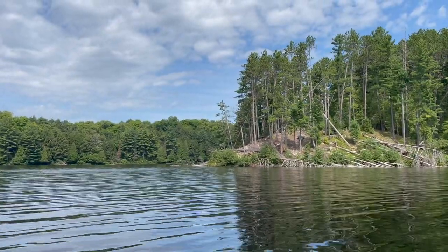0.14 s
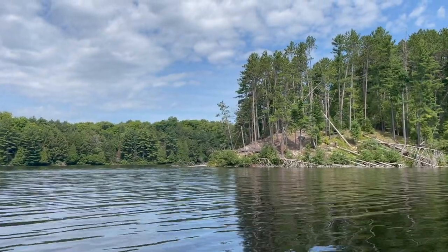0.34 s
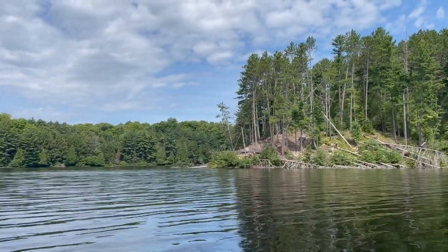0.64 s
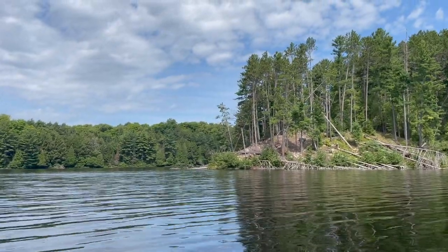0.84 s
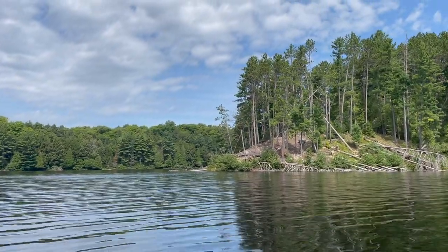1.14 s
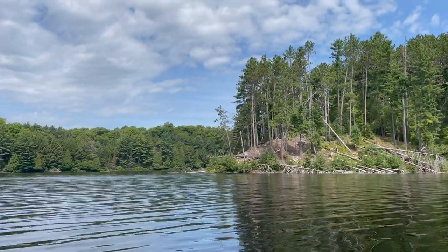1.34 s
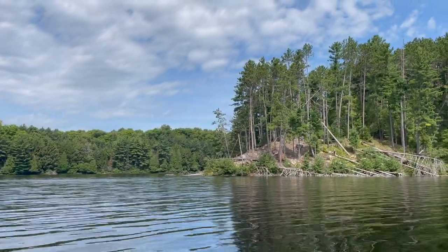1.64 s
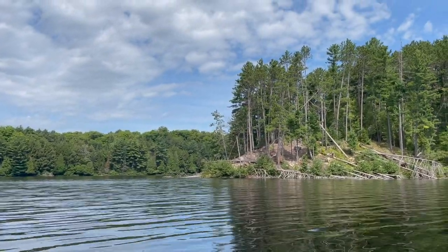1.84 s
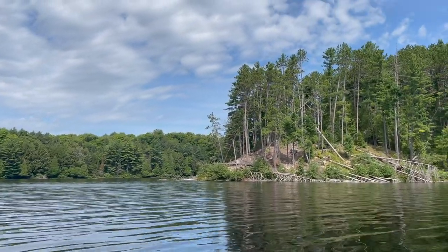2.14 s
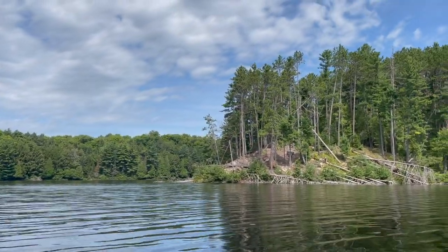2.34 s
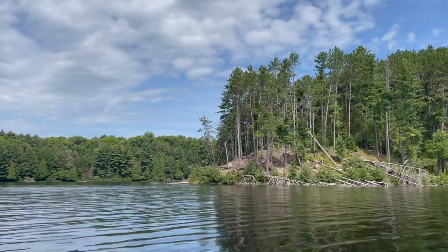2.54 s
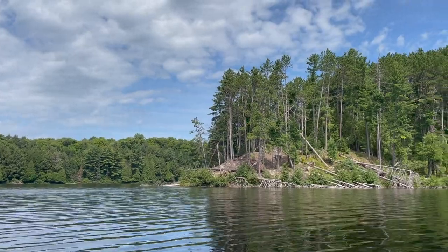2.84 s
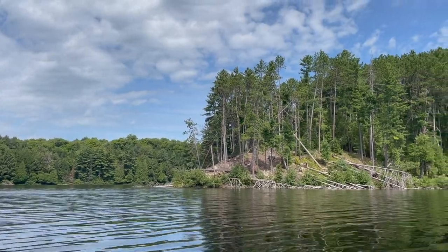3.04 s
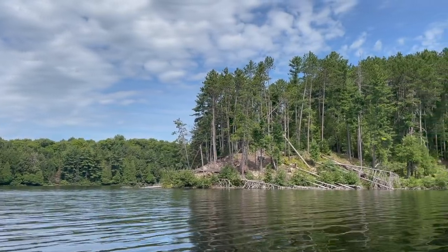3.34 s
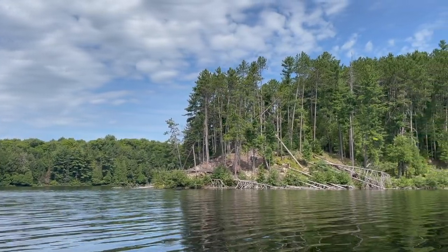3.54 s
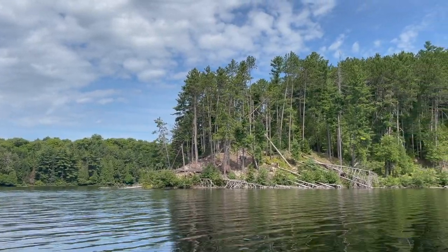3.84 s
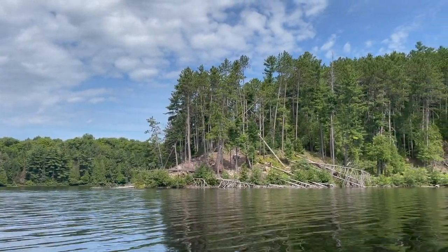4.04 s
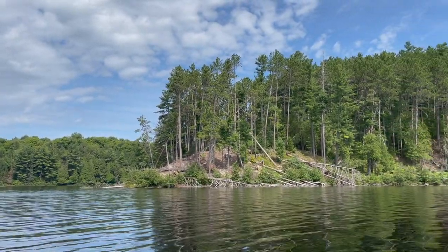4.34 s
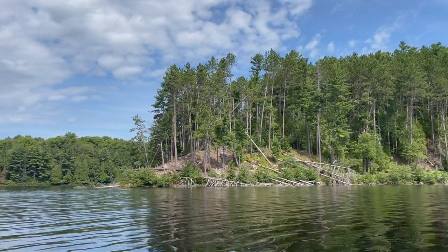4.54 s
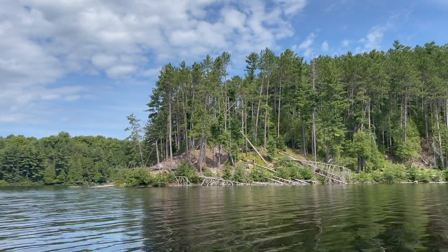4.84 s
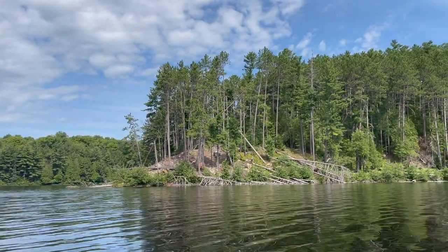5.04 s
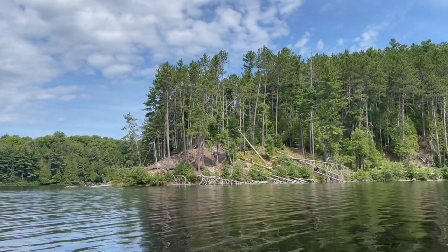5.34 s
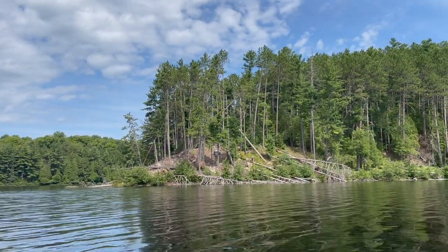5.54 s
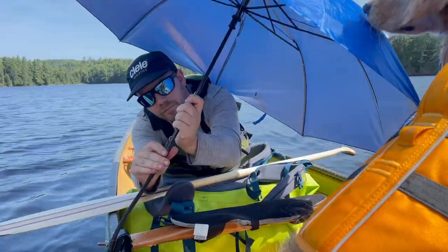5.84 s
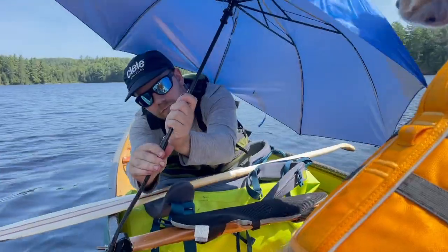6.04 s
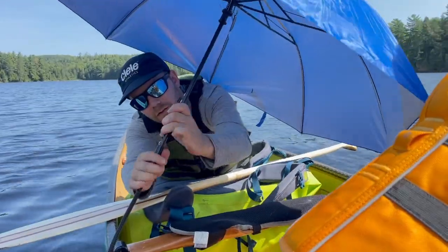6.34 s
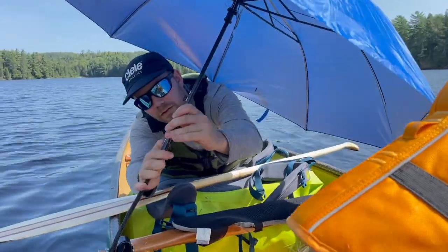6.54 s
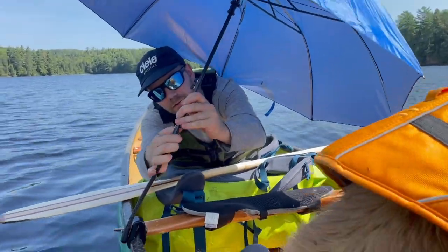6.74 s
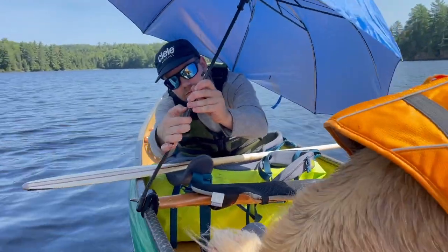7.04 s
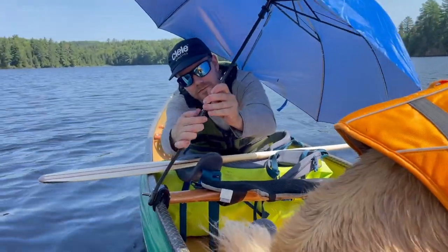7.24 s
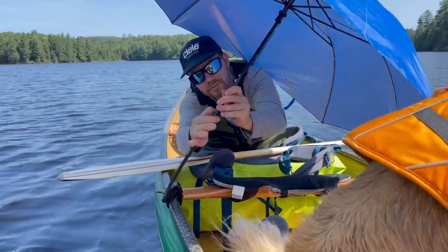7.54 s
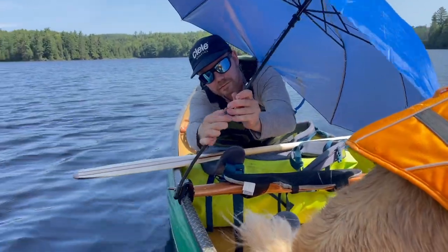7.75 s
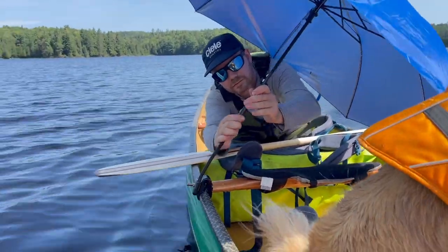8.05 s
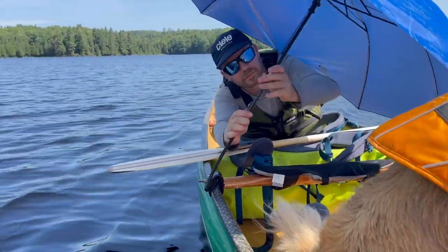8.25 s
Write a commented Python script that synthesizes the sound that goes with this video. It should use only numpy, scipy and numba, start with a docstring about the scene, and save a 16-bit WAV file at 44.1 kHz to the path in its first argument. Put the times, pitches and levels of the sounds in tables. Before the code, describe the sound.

Water trickles, bubbles and laps along a canoe hull under a low breeze rumble, then wind buffets the microphone as umbrella cloth rustles and snaps.

```python
"""A canoe on a calm lake, heard on the two microphones of a phone, in two scenes with a brief silence between.
First a breeze, as filtered noise, booms in the hull while water trickles, laps and fizzes along it:
bubbles are decaying sines, foam and wash are coloured noise. Then stronger wind buffets the microphones;
close by, umbrella cloth rustles as noise and crackle, a rib squeaks, and the catch snaps as ringing metal.
Dull knocks of hands and gear fall in both scenes."""
import sys
import numpy as np
from scipy import signal
from scipy.fft import rfft, irfft, next_fast_len
from scipy.io import wavfile
from scipy.ndimage import uniform_filter1d
from numba import njit

SR = 44100
rng = np.random.default_rng(int(sys.argv[2]) if len(sys.argv) > 2 else 0)


def wav_record(signal):
    """Record a signal, one row per channel, as 16-bit PCM in the file named by sys.argv[1]."""
    frames = np.transpose(np.atleast_2d(signal))
    bounded = np.clip(frames, -1, 1)
    # unit amplitude maps onto the largest positive 16-bit level
    quanta = np.round(bounded * 32767).astype(np.int16)
    wavfile.write(sys.argv[1], SR, quanta)


N = 369986
CUT_S, RESUME_S = 5.802, 5.842  # end of the first scene, start of the second


def undb(db):
    """Gain of a level in dB."""
    return 10 ** (np.asarray(db) / 20)


def unit(x):
    """Scaled to rms 1."""
    return x / np.sqrt(np.mean(x ** 2))


def sides(pan_db):
    """Left and right gains for a left-minus-right difference in dB."""
    return undb(np.array([pan_db, -pan_db]) / 2)


def columns(rows):
    """Every column of a curve over time, interpolated sample by sample."""
    s, *rest = np.transpose(rows)
    return [np.interp(np.arange(N) / SR, s, column) for column in rest]


def colour(x, points):
    """Shapes each channel to a spectrum of (frequency, level) points; rms 1."""
    hz, db = np.transpose(points)
    size = next_fast_len(N)
    f = np.arange(1, size // 2 + 2) * SR / size
    gain = undb(np.interp(np.log(f), np.log(hz), db, left=-90, right=-90))
    return unit(irfft(rfft(x, size) * gain, size)[..., :N])


def pair(alike):
    """Noise on two sides with the given likeness, 0 to 1."""
    mid, side = rng.standard_normal((2, N))
    alike = np.clip(alike, 0, 1)
    opposite = np.array([[1], [-1]])
    return np.sqrt((1 + alike) / 2) * mid + np.sqrt((1 - alike) / 2) * side * opposite


def walk(rate):
    """Random levels held 1 / rate s and smoothed twice; spread near 1."""
    k = int(SR / rate)
    held = np.repeat(rng.standard_normal(N // k + 1), k)
    return 1.3 * uniform_filter1d(uniform_filter1d(held, k), k)[:N]


@njit
def svf(x, hz, damp):
    """State-variable band-pass with a moving centre; width = damp * centre."""
    y, b, l = np.empty(len(x)), 0., 0.
    for i in range(len(x)):
        g = np.tan(np.pi * hz[i] / SR)
        v = (b + g * (x[i] - l)) / (1 + g * (g + damp))
        b, l, y[i] = 2 * v - b, l + 2 * g * v, damp * v
    return y


@njit
def rings(start, hz, t60, rise, glide, left, right):
    """Decaying sines that swell for rise s and glide in pitch by a share over their t60."""
    out = np.zeros((2, N))
    for k in range(len(start)):
        i0, n = int(start[k] * SR), int((t60[k] + rise[k]) * SR)
        phase = 0.
        for i in range(min(n, N - i0)):
            t = i / SR
            phase += 2 * np.pi * hz[k] * (1 + glide[k] * t / t60[k]) / SR
            env = np.sin(.5 * np.pi * t / rise[k]) ** 2 if t < rise[k] else 1000. ** ((rise[k] - t) / t60[k])
            out[0, i0 + i] += left[k] * env * np.sin(phase)
            out[1, i0 + i] += right[k] * env * np.sin(phase)
    return out


def ring(s, hz, db, t60, rise, glide=0., pan_db=0.):
    """Decaying sines from columns or single values."""
    settings = np.broadcast_arrays(np.atleast_1d(s), hz, db, t60, rise, glide, pan_db)
    s, hz, db, t60, rise, glide, pan_db = (1. * a for a in settings)
    left, right = undb(db) * sides(pan_db)
    return rings(s, np.minimum(hz, .45 * SR), np.maximum(t60, 1e-4), np.maximum(rise, 1e-5), glide, left, right)


def crackle(per_s, spread_db, alike):
    """Lone clicks of uneven but bounded size, each at its own place."""
    hit = rng.random(N) < per_s / SR
    return hit * undb(spread_db * np.minimum(rng.exponential(size=N), 3)) * pair(alike)


def droplets(count, hz_of, cycles, swell, spread_db, wide_db):
    """Bubbles at random moments, pitches, sizes and places; rms 1 while the first scene lasts."""
    when, pitch, size, place, length = rng.random((count, 5)).T
    hz = hz_of(pitch)
    db = spread_db * np.minimum(-np.log(size), 3.2)
    out = ring(when * CUT_S, hz, db, cycles * (.6 + length) / hz, swell / hz, .08, wide_db * (place - .5))
    return unit(out) * np.sqrt(CUT_S * SR / N)


def swells(s, length, db, rise_s, fall_s):
    """Gain of events that swell, hold and fade; rise and fall are the times for 20 dB."""
    length, rise_s, fall_s = (np.reshape(np.maximum(a, 1e-3), (-1, 1)) for a in (length, rise_s, fall_s))
    late = np.arange(N) / SR - s[:, None]
    below = np.maximum(-late / rise_s, 0) + np.maximum((late - length) / fall_s, 0)
    return np.sqrt((undb(db[:, None] - 20 * below) ** 2).sum(axis=0))


# Spectrum of the steady air over the lake: (frequency [Hz], relative level per Hz [dB])
AIR_SPECTRUM = [(150, -11), (250, 3), (1000, -9.5), (2600, -28), (6000, -24.5), (9000, -33), (11000, -45.5)]
AIR_DB = -76, -92.5  # in the first and second scene


def lake_air():
    """Steady air over the lake: coloured noise, almost unlike on the two microphones."""
    return colour(pair(0.086), AIR_SPECTRUM)


# Wavelets that lap the hull: (time [s], relative wash level [dB], relative low thud level [dB])
HULL_LAPS = [(0.068, -52.5, -70), (0.259, -54, -79), (0.34, -49.5, -76), (0.373, -53, -75),
             (0.396, -48, -71), (0.574, -49.5, -69), (0.876, -50.5, -55.5), (0.91, -55.5, -68),
             (1.295, -55, -71.5), (1.642, -55, -64), (1.886, -58, -66), (2.452, -50, -68),
             (2.531, -54, -65), (2.829, -51.5, -52), (3.115, -47.5, -71), (3.493, -57, -66),
             (3.654, -56.5, -67.5), (3.88, -60, -68), (3.969, -46, -68.5), (4.684, -47.5, -51.5),
             (4.769, -52, -63), (4.831, -56, -44), (4.932, -58, -55), (5.063, -53.5, -70),
             (5.223, -50.5, -86), (5.524, -45.5, -47), (5.785, -41, -78)]
LAP_RISE_S, LAP_FALL_S, THUD_FALL_S = .035, 0.11, 0.2  # times to change by 20 dB


def lap_gain():
    """Gains of the wash and of the thud: each lap swells before its time and fades after it."""
    s, wash_db, thud_db = np.transpose(HULL_LAPS)
    wash = swells(s, 0, wash_db - 15, LAP_RISE_S, LAP_FALL_S)
    thud = swells(s, 0, thud_db - 0.5, LAP_RISE_S, THUD_FALL_S)
    return wash, thud


# Steady breeze across the canoe: (time [s], relative level [dB])
BREEZE_LEVEL = [(0, -48.5), (.12, -61), (.7, -55), (.83, -71.5), (1.0, -51.5), (1.12, -61), (1.3, -57),
                (2.1, -53), (2.45, -62), (3.0, -46), (3.35, -53), (3.85, -64.5), (4.1, -52.5), (5.3, -56),
                (5.42, -61.5), (5.6, -51.5), (5.8, -47)]
# Puffs on top of it: (start [s], relative level [dB], length [s])
BREEZE_PUFFS = [(0.204, -47, 0.11), (0.63, -49, 0.033), (0.88, -49, 0.069), (1.54, -55, 0.077),
                (1.842, -43, 0.057), (2.556, -48, 0.027), (2.86, -44, 0.02), (4.082, -52, 0.015),
                (4.424, -44.5, 0.009), (4.688, -33.5, 0.067), (4.825, -33.5, 0.14), (5.039, -40.5, 0.045),
                (5.26, -51, 0.027), (5.47, -52, 0.12), (5.797, -38.5, .03)]
# Deep turbulence against the boom: (time [s], relative level [dB])
DEEP_LEVEL = [(0, -8), (2.9, -8), (3.3, -10), (4.1, 1), (5.8, -1)]
# Spectrum of that turbulence: (frequency [Hz], relative level per Hz [dB])
DEEP_SPECTRUM = [(15, -34.5), (28, -6), (60, 4.5), (105, -11), (135, -32), (190, -50)]
# Spectrum of the flutter and the thuds: (frequency [Hz], relative level per Hz [dB])
FLUTTER_SPECTRUM = [(105, -27), (130, 2.5), (170, -2.5), (230, -5.5), (330, -40)]
PUFF_RISE_S, PUFF_FALL_S = 0.013, 0.082  # times to change by 20 dB
HULL_HZ, HULL_WIDTH_HZ = 101, 15  # the boom of the hull; width of each of two band-passes


def breeze():
    """Turbulence booms in the hull over a deeper rumble; flutter and the thuds of the laps lie above."""
    s, db, length = np.transpose(BREEZE_PUFFS)
    gain = np.hypot(undb(columns(BREEZE_LEVEL)[0]), swells(s, length, db, PUFF_RISE_S, PUFF_FALL_S))
    hz, damp = np.full(N, 1. * HULL_HZ), HULL_WIDTH_HZ / HULL_HZ
    boom = unit(np.array([svf(svf(x, hz, damp), hz, damp) for x in pair(0.72)]))
    deep = colour(pair(0.84), DEEP_SPECTRUM) * undb(columns(DEEP_LEVEL)[0] + 4.1 * walk(11))
    flutter_gain = np.hypot(gain * undb(-29), lap_gain()[1])
    return (boom + deep) * gain * undb(-3.0) + colour(pair(0.72), FLUTTER_SPECTRUM) * flutter_gain


# Spectrum of the wash along the hull: (frequency [Hz], relative level per Hz [dB])
WASH_SPECTRUM = [(180, -2), (260, -2), (500, -12), (1100, -14.5), (2600, -24), (4200, -46)]


def wash():
    """Dull wash: noise, clicks and scattered plops that swell with each lap."""
    plops = droplets(count=900, hz_of=lambda u: 350 * 9.96 ** u, cycles=26, swell=2.2, spread_db=4.5, wide_db=35.5)
    rush = colour(pair(0.18) + 0.3 * unit(crackle(150, 3.0, 0.24)), WASH_SPECTRUM)
    between_laps = undb(-86)
    return np.hypot(between_laps, lap_gain()[0]) * (rush + 0.6 * plops) * undb(3.0 * walk(55) + 2.5)


# Trickle along the hull: (time [s], relative level [dB])
TRICKLE_LEVEL = [(0.0, -70.5), (0.45, -71), (0.9, -81), (1.58, -76), (1.87, -74.5), (2.34, -72),
                 (2.89, -78), (3.46, -67.5), (3.6, -74), (3.86, -70.5), (4.09, -67.5), (4.31, -75),
                 (4.54, -80), (5.01, -70), (5.54, -80), (5.8, -75.5)]


def trickle():
    """Small bubbles that ring near one pitch under the hull, over a patchy narrow hum."""
    small = droplets(count=1500, hz_of=lambda u: 1640 * (u / (1 - u)) ** 0.1,
                     cycles=40, swell=4, spread_db=5.2, wide_db=12.5)
    hum = np.array([svf(x, np.full(N, 1650.), 0.12) for x in pair(0.31)])
    both = small + unit(hum) * undb(-2.5 + 3.5 * walk(30))
    return undb(columns(TRICKLE_LEVEL)[0]) * both * undb(3.2 * walk(11))


# Patches of foam: (start [s], length [s], relative level [dB])
FOAM_PATCHES = [(0.005, 0.11, -66), (0.27, 0.074, -78), (0.435, 0.2, -74), (1.27, 0.048, -68.5),
                (1.72, 0.46, -69.5), (2.39, 0.15, -73), (2.805, 0.013, -85), (3.152, 0.35, -74.5),
                (3.577, 0.2, -66), (3.872, 0.56, -66), (4.665, 0.094, -67), (5.028, 0.06, -67),
                (5.49, 0.036, -79.5), (5.804, .03, -64)]
# Single spits of spray: (time [s], relative level [dB], starting frequency [Hz])
SPRAY_SPITS = [(0.0635, -48, 3510), (0.1153, -59, 3270), (0.197, -51.5, 5000), (0.271, -54, 4830),
               (0.4252, -51, 6300), (1.303, -53.5, 3250), (1.8034, -46, 4120), (1.876, -54.5, 8300),
               (1.906, -49, 8100), (1.98, -55, 4740), (2.057, -56, 4300), (2.206, -54, 3900),
               (2.384, -57, 4500), (2.457, -50, 4930), (3.487, -53, 4240), (3.714, -52, 4320),
               (3.7614, -53, 3300), (3.8046, -51.5, 4900), (3.8954, -49, 4200), (3.9482, -38.5, 4900),
               (3.977, -51, 4800), (4.0465, -48, 3500), (4.0933, -40.5, 4300), (4.274, -51, 3410),
               (4.296, -51.5, 6100), (4.374, -47, 6500), (4.665, -47.5, 6560), (4.7393, -43, 5360),
               (4.766, -52, 6500), (4.8281, -54, 6300), (5.004, -54, 6160), (5.0515, -51.5, 5100),
               (5.118, -54, 4340)]
# Spectrum of the fizz: (frequency [Hz], relative level per Hz [dB])
FIZZ_SPECTRUM = [(1470, -34.5), (2500, 4.5), (2740, -6), (4230, 0), (5180, 1.5), (5680, 1.5), (8590, -2.5),
                 (12000, -55.5), (15600, -87), (22000, -120)]
FOAM_RISE_S, FOAM_FALL_S = 0.056, 0.11  # times to change by 20 dB
SPIT_RISE_S, SPIT_FALL_S = 0.00068, 0.015  # times to change by 20 dB
FIZZ_LAG = 9  # samples by which the left microphone hears the fizz later


def foam():
    """Fizz of fine droplets, noise and clicks in patches; each spit is a burst of it with a short ring."""
    gain = swells(*np.transpose(FOAM_PATCHES), FOAM_RISE_S, FOAM_FALL_S) * undb(2.8 * walk(50))
    s, db, hz = np.transpose(SPRAY_SPITS)
    gain = np.hypot(gain, swells(s, 0, db - 10.5, SPIT_RISE_S, SPIT_FALL_S))
    spits = ring(s, hz, db - 4, t60=48 / hz, rise=0.00066, glide=0.054, pan_db=2.6)
    fine = droplets(count=3500, hz_of=lambda u: 2600 * 3.8 ** u, cycles=24, swell=2, spread_db=4.6, wide_db=18)
    grains = fine + 0.53 * pair(0.1) + 0.8 * unit(crackle(430, 4.5, 0.25))
    fizz = colour(grains, FIZZ_SPECTRUM) * undb(-5.0)
    fizz[0] = np.roll(fizz[0], FIZZ_LAG)
    return gain * fizz + spits


# Loud bubbles at the hull: (start [s], level [dB], starting frequency [Hz], left minus right [dB])
LOUD_BUBBLES = [(0.274, -49, 1590, 6), (0.338, -56, 2280, 2), (0.374, -53, 1840, 4), (0.3914, -40, 1533, 6),
                (0.399, -43.5, 1580, 8), (0.58, -54, 1720, 3), (0.98, -58.5, 1580, 8),
                (0.996, -60, 1290, 6), (1.2543, -53, 1550, 7), (1.273, -49, 1630, 4), (1.297, -47, 1650, 5),
                (1.64, -59, 1660, 6), (1.8793, -51, 1600, 5), (1.911, -50.5, 1540, 4),
                (1.552, -62, 1700, 4), (2.29, -57, 1940, -4), (2.382, -54, 1670, 6), (2.4597, -57, 1600, 6),
                (2.575, -48, 1600, 6), (2.834, -56, 2240, 2), (3.019, -55.5, 1430, 8),
                (3.105, -53, 1580, 6), (3.303, -43.5, 1870, 4), (3.311, -47, 1600, 6),
                (3.433, -46.5, 1650, 4), (3.597, -52.5, 1600, 8), (3.9283, -46, 1510, 8),
                (3.977, -50.5, 1330, 17), (4.2742, -61, 1630, 2), (4.682, -45, 1170, 5),
                (4.77, -58, 1520, 5), (4.743, -57, 1500, 11), (4.829, -59, 1640, 4), (4.866, -55, 1960, 2),
                (5.031, -55, 1700, 5), (5.06, -54, 2110, 5), (5.222, -51.5, 2060, 4), (5.38, -57, 1840, 3),
                (5.403, -56, 1520, 4), (5.751, -46, 1430, 7), (5.761, -54, 1540, 5),
                (5.7892, -41, 1480, 6.5)]


def bubbles():
    """Loud bubbles: sines that rise a little in pitch as they decay, each with a weaker, later one above."""
    s, db, hz, pan_db = np.transpose(LOUD_BUBBLES)
    main = ring(s, hz, db, 32 / hz, 0.002, 0.04, pan_db)
    return main + ring(s + .004, 1.12 * hz, db - 9, 30 / hz, 0.003, 0.05, pan_db)


# Stronger wind: (time [s], relative level [dB], band centre [Hz], relative deep rumble level [dB])
WIND_GUSTS = [(5.84, -44.5, 320, -64), (5.92, -72, 328, -66), (6.01, -44, 187, -63), (6.1, -50, 191, -44),
              (6.22, -44.5, 180, -55), (6.28, -41.5, 211, -39.5), (6.36, -48.5, 238, -56),
              (6.52, -56.5, 207, -63), (6.6, -57, 204, -65), (6.79, -51.5, 234, -63.5),
              (6.9, -47.5, 234, -54), (6.95, -48, 195, -51), (7.07, -45.5, 290, -42),
              (7.14, -42.5, 410, -103), (7.3, -60, 337, -99), (7.47, -51, 345, -102),
              (7.58, -57.5, 368, -102), (7.66, -52.5, 334, -98), (7.73, -35, 448, -69.5),
              (7.83, -48, 235, -62), (7.98, -42.5, 255, -47), (8.32, -39, 258, -46), (8.39, -57, 187, -46)]
# Spectrum of its deep rumble: (frequency [Hz], relative level per Hz [dB])
RUMBLE_SPECTRUM = [(20, -17), (40, -25.5), (70, 0.5), (100, 3.5), (125, 0), (150, 11)]


def wind():
    """Turbulence in a band that moves with the gust; the higher it lies, the less alike the microphones."""
    db, hz, rumble_db = columns(WIND_GUSTS)
    noise = pair(1.55 - hz / 400) * undb(4.2 * walk(55))
    damp = 1.114
    wide = np.array([svf(svf(svf(x, hz, damp), hz, damp), hz, damp) for x in noise])
    band = np.array([svf(x, hz, damp) for x in wide]) + 0.23 * wide
    band = np.diff(band, prepend=0) * SR / (2 * np.pi * hz)  # the slope tilts the band towards the treble
    band *= undb(db - 2.5) * sides(hz / 120) / np.sqrt(hz * damp / SR)
    return band + colour(pair(1.0), RUMBLE_SPECTRUM) * undb(rumble_db + 3.45 * walk(30))


# Single buffets of wind on the microphones: (start [s], relative level [dB], nominal frequency [Hz])
WIND_BUFFETS = [(1.828, -30, 84.5), (4.685, -29, 79), (4.833, -23, 92.7), (4.903, -20, 80.7),
                (5.844, -39.5, 340), (6.001, -27, 190), (6.025, -36, 168), (6.239, -30.5, 201),
                (6.263, -26, 184), (6.297, -24, 193), (6.304, -24.5, 407), (6.421, -29, 555),
                (6.855, -24, 570), (6.939, -32, 151), (6.985, -27, 340), (7.086, -33, 600),
                (7.12, -18, 517), (7.143, -26, 502), (7.168, -32, 398), (7.205, -24, 558),
                (7.218, -28.5, 445), (7.31, -44, 410), (7.333, -34, 420), (7.428, -34, 323),
                (7.458, -20, 390), (7.475, -22, 450), (7.51, -26, 485), (7.6, -30, 355), (7.628, -39, 416),
                (7.894, -32, 377), (7.962, -22.5, 247.5), (7.993, -33.5, 250), (8.022, -29.5, 253),
                (8.034, -24.5, 295), (8.064, -29, 254), (8.09, -25, 634), (8.107, -27, 214),
                (8.167, -27.5, 288), (8.244, -27, 234), (8.3, -32, 300)]


def buffets():
    """A few cycles of pressure swing with two weaker upper swings; higher ones drift apart between the sides."""
    s, db, hz = np.transpose(WIND_BUFFETS)
    swell = 0.0031 + 0.63 / hz
    pan_db = 6 / (1 + (375 / hz) ** 8)  # buffets above 375 Hz lean left
    chance = rng.random((len(s), 2)).T
    upper = 1.45 + 0.2 * chance[0]
    apart = 1 + (hz / 1300) ** 2 * (chance[1] - .5)

    def swings(f):
        main = ring(s, f, db, 7.3 / hz, swell, -0.0045, pan_db)
        second = ring(s, f * upper, db - 7.0, 2.0 / hz, swell, -0.13, pan_db)
        third = ring(s + swell / 2, f * upper ** 2, db - 22, 2.5 / hz, swell / 2, 0, pan_db)
        return main + second + third

    return np.array([swings(hz * apart)[0], swings(hz / apart)[1]])


# Swells of soft hiss close by: (start [s], length [s], relative level [dB])
HISS_SWELLS = [(7.466, 0.056, -57.5), (7.588, 0.029, -63.5), (7.92, 0.027, -68.5), (8.268, 0.027, -57.5),
               (8.343, 0.038, -66)]
# Its resonances: (frequency [Hz], relative level per Hz [dB])
HISS_SPECTRUM = [(1500, -12), (2300, 1), (3100, -13), (4300, 0.5), (5200, -6), (5900, -29.5), (7200, -13),
                 (8000, -24)]


def hiss():
    """Smooth noise in three resonances that swells slowly and stops quickly."""
    gain = swells(*np.transpose(HISS_SWELLS), rise_s=0.11, fall_s=0.023)
    return colour(pair(0.42), HISS_SPECTRUM) * gain * undb(2 * walk(66))


# Knocks and ticks of hands and gear:
# (time [s], relative level [dB], body centre [Hz], treble relative to body [dB], left minus right [dB])
GEAR_KNOCKS = [(0.0467, -48.5, 1900, -30, 3), (3.9715, -45, 1280, -33, 0), (3.982, -43.5, 594, -37, 9),
               (4.678, -44.5, 910, -36, 10), (5.879, -35, 815, -20, 4), (5.909, -35, 1490, -7, 1),
               (5.992, -40.5, 1140, 18.5, 1), (6.026, -32.5, 890, 3, 11), (6.086, -31, 1110, -23, 9),
               (6.464, -47.5, 1070, 11, 8), (6.855, -38, 860, 9, 15), (6.936, -40, 1410, -13, -7),
               (6.983, -38, 1570, -25, -2), (7.385, -33, 2030, -9, -8), (7.682, -28.5, 668, -8, 3.5),
               (7.693, -45, 770, 5, -9), (7.795, -39.5, 1900, -25, -0.5), (7.819, -40, 1480, -1, 4),
               (7.834, -40.5, 1730, -29, 4), (7.881, -38.5, 724, -26.5, 6.5), (7.938, -42.5, 1096, -20, -6),
               (8.047, -43.5, 1100, -20, -14)]


def knocks():
    """A dull broad tap of many close, short rings around the body pitch and a crack of treble noise."""
    out, t = np.zeros((2, N)), np.arange(1200) / SR
    octaves = np.linspace(-1, 1, num=9)
    cracks = rng.standard_normal((len(GEAR_KNOCKS), len(t)))
    for (s, db, hz, treble_db, pan_db), crack in zip(GEAR_KNOCKS, cracks):
        # the same random numbers scatter the rings in time and pitch
        late = 0.001197 * np.abs(crack[-len(octaves):])
        body_hz = hz * 2 ** (0.887 * octaves + 0.1 * crack[:len(octaves)])
        out += ring(s + late, body_hz, db - 5.5 - 9.5 * octaves ** 2, 0.015, 0.00056, 0, pan_db)
        treble = np.diff(crack, prepend=0) * 1000. ** (-t / 0.0041) * undb(db + treble_db - 12.0)
        i = int(s * SR)
        out[:, i:i + len(t)] += treble * sides(pan_db)[:, None]
    return out


# Swishes of umbrella cloth close by: (start [s], length [s], relative level [dB], relative brightness [dB])
CLOTH_SWISHES = [(5.864, 0.088, -58.5, 0), (5.912, 0.015, -46.5, -4.5), (5.937, 0.024, -66, 2),
                 (5.991, 0.033, -49.5, -8), (6.101, 0.056, -42, -4.5), (6.626, 0.12, -54.5, -3.5),
                 (6.852, 0.0037, -41.5, -5), (6.88, 0.17, -51.5, -9), (6.94, 0.0051, -48, -12),
                 (7.032, 0.014, -42.5, -2.5), (7.09, 0.21, -66.5, -4), (7.384, 0.015, -54, -8),
                 (7.459, 0.048, -64, 1.5), (7.582, 0.019, -63.5, -0.5), (7.683, 0.0075, -42, -13.5),
                 (7.726, 0.0021, -28, -2.5), (7.757, 0.05, -55.5, -8.5), (7.911, 0.021, -60.5, -4.5),
                 (8.047, 0.0066, -51.5, -18), (8.236, 0.048, -60, -2), (8.367, 0.055, -64.5, -0.5)]
# Spectra of the cloth's body, its crisp treble and its top: (frequency [Hz], relative level per Hz [dB])
CLOTH_SPECTRUM = [(300, 1.5), (700, 1), (1240, -4), (2300, -7), (2900, -18.5), (3600, -21.5)]
CRISP_SPECTRUM = [(2300, -9), (3000, 0), (4300, 1), (5600, -4.5), (7200, -1.5), (8000, -13.5),
                  (8500, -47.5)]
SHEEN_SPECTRUM = [(8800, -37), (9700, -8.5), (12000, -6), (14800, -1), (16500, -9.5)]
# A rib squeaks against the cloth: (start [s], frequency [Hz], relative level [dB])
RIB_SQUEAK = [(7.032, 2890, -41), (7.037, 1600, -42.5), (7.038, 5300, -51)]


def umbrella():
    """Cloth that rubs, crinkles and squeaks once; the top reaches both microphones much alike."""
    s, length, db, bright_db = np.transpose(CLOTH_SWISHES)
    # times to change by 20 dB
    rise_s, fall_s = 1.45 * length, 0.017 + 1.29 * length
    steady_rustle = undb(-75.5)
    body, crisp, top = (np.hypot(steady_rustle, swells(s, length, db + more_db, rise_s, fall_s))
                        for more_db in (0, bright_db, 5 + 1.57 * bright_db))
    flutter = undb(2.1 * walk(90))
    rub = unit(crackle(900, 2.4, 0.23)) * 0.42 + pair(0.13)
    cloth = colour(rub, CLOTH_SPECTRUM) * body * undb(2.5) + colour(rub, CRISP_SPECTRUM) * crisp
    cloth *= sides(1.0)[:, None]
    sheen = colour(pair(0.75), SHEEN_SPECTRUM) * top
    s, hz, db = np.transpose(RIB_SQUEAK)
    squeak = ring(s, hz, db, t60=0.051, rise=0.013)
    return flutter * (cloth + squeak) + sheen


# Ticks of the umbrella's catch: (time [s], relative level [dB])
CATCH_TICKS = [(7.7251, -15), (7.7259, -1), (7.7274, -11), (7.7297, -5)]
# Modes of each tick: (frequency [Hz], relative level [dB], t60 [s], gain on the right, negative is inverted)
CATCH_MODES = [(14400, 0, .005, 1), (13300, -7, .005, 1), (10800, -3, .005, -.3), (9700, -7, .005, -.2),
               (8000, -14, .006, -.5), (5300, -14, .006, .3)]
# Modes of the shaft: (frequency [Hz], level [dB], t60 before a factor for each side [s])
UMBRELLA_SHAFT = [(674, -4, 0.025), (1048, -13.5, 0.034), (1395, -13.5, 0.021), (330, -18.5, 0.058),
                  (2650, -30, 0.016)]
SHAFT_S, SHAFT_LAG_S = 7.7272, .0011  # start on the left, delay on the right


def catch():
    """Metal ticks, some modes in opposite phase on the two sides; the shaft rings left first, then right."""
    hz, db, t60, right_gain = np.transpose(CATCH_MODES)
    modes = [sum(ring(s, f, tick_db + d - 0.5, t, .0001)[0] for s, tick_db in CATCH_TICKS)
             for f, d, t in zip(hz, db, t60)]
    ticks = np.array([sum(modes), right_gain @ np.array(modes)])
    hz, db, t60 = np.transpose(UMBRELLA_SHAFT)
    left = ring(SHAFT_S, hz, db, t60 * .6, 0.0014)[0]
    right = ring(SHAFT_S + SHAFT_LAG_S, hz, db, t60 * 1.2, 0.0014)[0]
    t = np.maximum(np.arange(N) / SR - CATCH_TICKS[0][0], 0)
    rattle = (t > 0) * 1000. ** (-t / 0.015) * np.diff(pair(.85), prepend=0) * undb(-19.5)
    return ticks + np.array([left, right]) + rattle


def scene():
    """Two scenes, each with its wind and steady sound, and the events on top."""
    t = np.arange(N) / SR
    first_on = np.clip((CUT_S - t) / 0.00058, 0, 1)
    second_on = np.clip((t - RESUME_S) / 0.00026, 0, 1)
    air, thumps, hits = lake_air(), buffets(), knocks()
    water = wash() + trickle() + foam() + bubbles()
    first = air * undb(AIR_DB[0]) + breeze() + water + thumps + hits
    # in the second scene the buffets pass twice through a band that moves with the wind's, so their deep part
    # is thin
    gust_hz = columns(WIND_GUSTS)[1]
    thin = np.array([svf(svf(x, gust_hz, 1.44), gust_hz, 1.44) for x in thumps]) * undb(4.0)
    # a high-pass at 180 Hz keeps the knocks and the catch free of bass
    no_bass = signal.butter(2, 180, "high", fs=SR, output="sos")
    hits_and_catch = signal.sosfilt(no_bass, hits + catch())
    second = air * undb(AIR_DB[1]) + wind() + thin + hiss() + umbrella() + hits_and_catch
    return first * first_on + second * second_on


def record(dry):
    """The phone cuts the top: a steep low-pass at 15850 Hz."""
    return signal.sosfilt(signal.ellip(10, .2, 80, 15850, fs=SR, output="sos"), dry)


dry = scene()
out = record(dry)
wav_record(out)
```